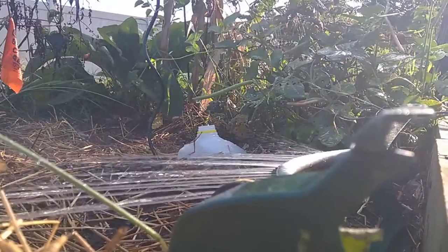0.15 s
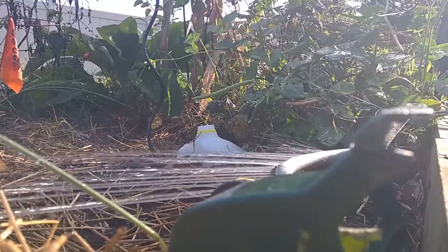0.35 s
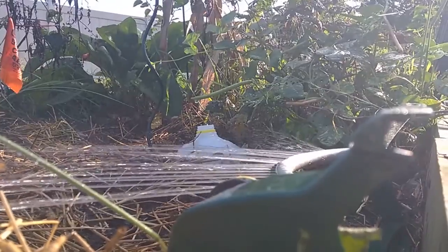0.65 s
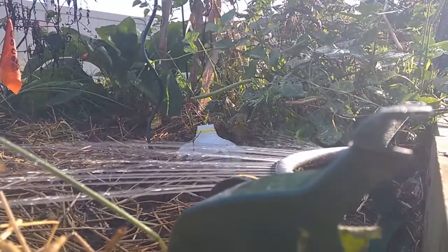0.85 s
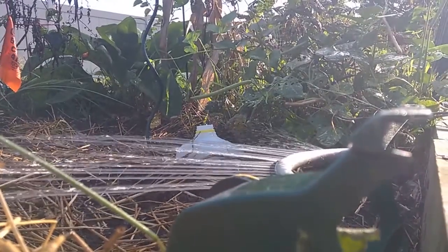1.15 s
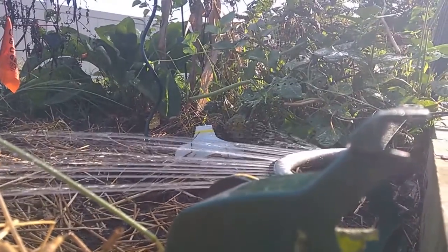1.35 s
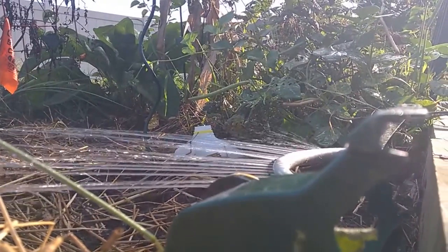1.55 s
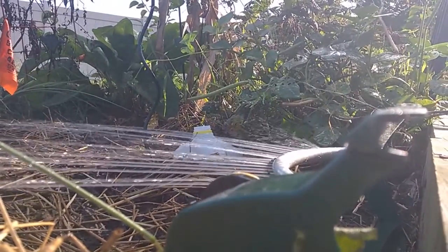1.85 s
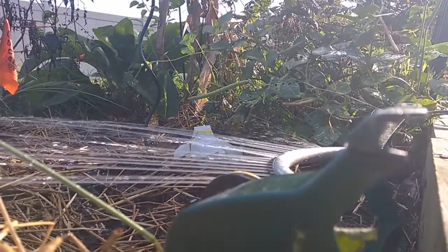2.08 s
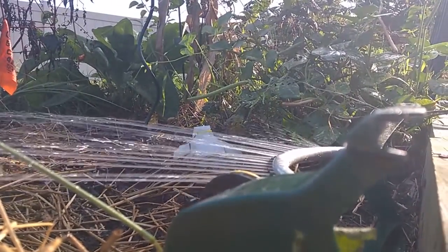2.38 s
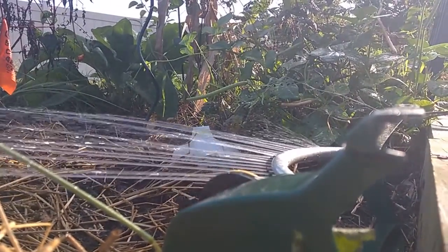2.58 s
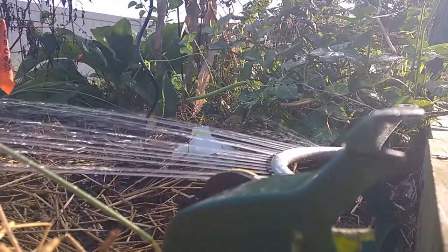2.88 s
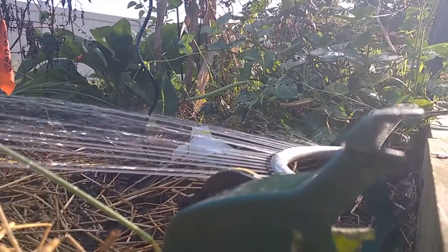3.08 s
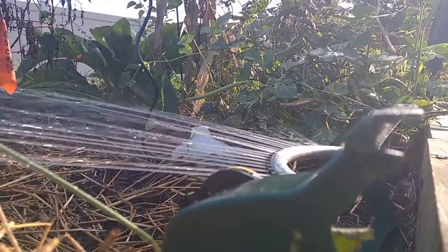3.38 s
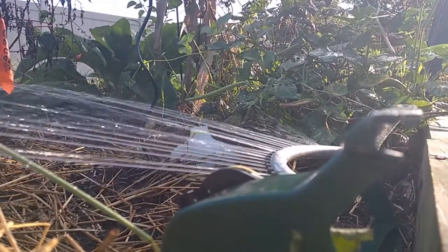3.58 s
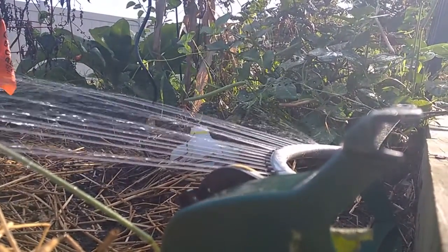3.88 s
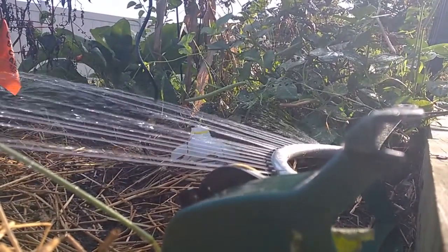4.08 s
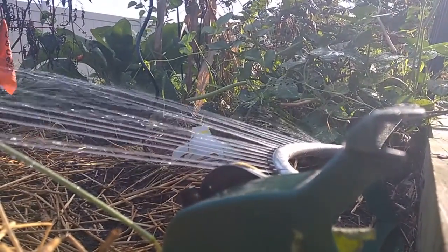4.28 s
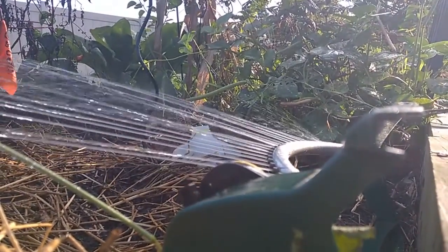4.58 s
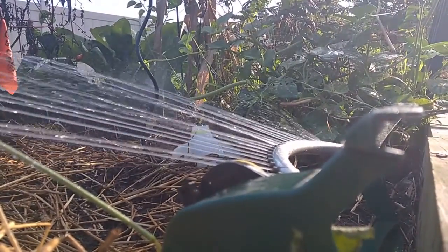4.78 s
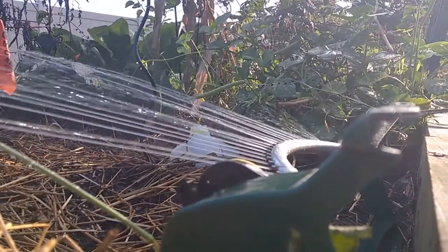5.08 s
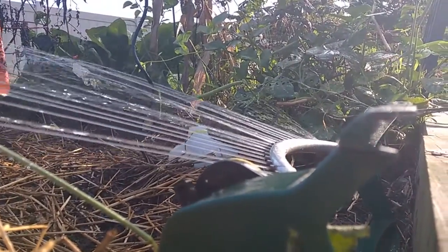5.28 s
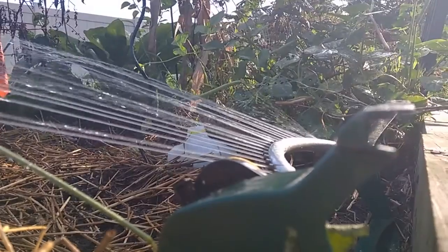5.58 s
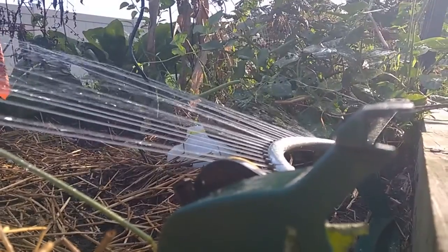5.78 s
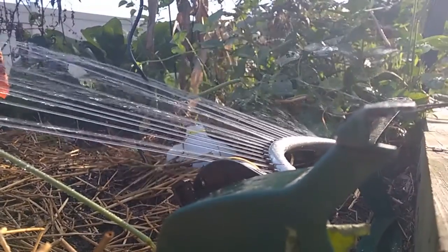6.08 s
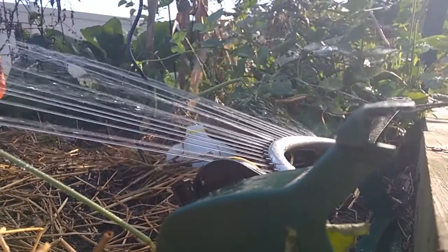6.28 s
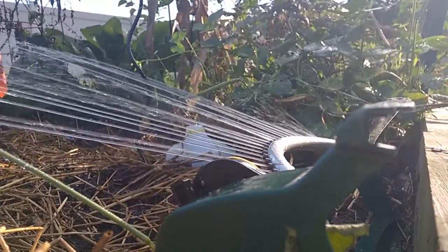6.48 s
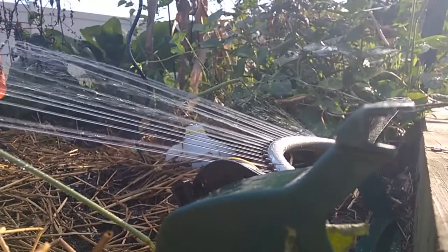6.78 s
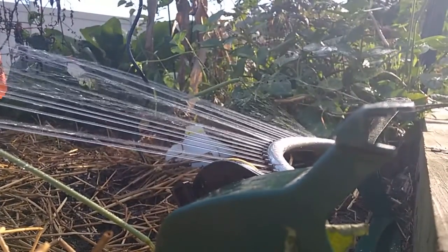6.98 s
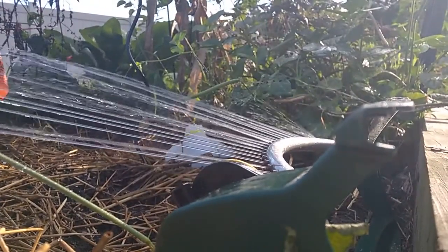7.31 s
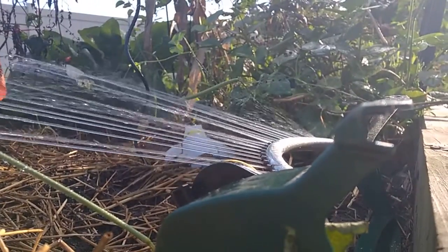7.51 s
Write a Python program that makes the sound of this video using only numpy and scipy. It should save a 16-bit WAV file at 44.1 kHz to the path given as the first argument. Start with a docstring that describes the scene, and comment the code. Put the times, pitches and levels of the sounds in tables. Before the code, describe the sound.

A garden sprinkler works very close to the microphone, over low outdoor rumble and dull air. Throughout, water rushes hollowly through tube and nozzles, pulsing with a water wheel that knocks about 24 times a second, a dry purring rattle with a faint hum. From 0 s low jets splash densely and crisply on near straw, with short brighter surges at about 1.5, 2.2 and, sharpest, 2.9 s, and smaller ones near 3.3 and 3.6. Single drops tick near. From about 4.5 s the splash dies away, gone by 5.1; between 4.6 and 4.95 quick low swishes, gulps and harder knocks crowd in. A finer high ticking patter of far drops takes over. At 5.6 s the wheel jumps slightly faster, its knocks often stronger and uneven. A soft low thump falls at 6.55 s. Rush, rattle and patter continue, with a small swish at the end, 7.6 s.

```python
"""An oscillating garden sprinkler close to one microphone, over a low outdoor rumble and a dull wash of air.
First the low jets splash on near straw with brief surges, while water rushes through tube and nozzles.
The jets lift and the splash dies away by 5.1 s; swishes and harder knocks come just before that.
A finer, ticking patter of far drops is left; the wheel jumps faster at 5.6 s and a soft thump follows.
Throughout, a water wheel knocks once a turn and hums. Water is filtered noise and drops; knocks are rings."""
import sys
import numpy as np
from scipy import signal
from scipy.io import wavfile
from scipy.ndimage import uniform_filter1d

SR = 44100
rng = np.random.default_rng(int(sys.argv[2]) if len(sys.argv) > 2 else 0)


def digitize_waveform(pressure):
    """Quantize a signal to 16-bit integers and store it at the path in sys.argv[1].

    Rows of a 2-D input are taken as channels; values are limited to [-1, 1].
    """
    field = np.atleast_2d(pressure).T
    bounded = np.clip(field, -1, 1)
    quanta = np.round(bounded * 32767).astype(np.int16)
    wavfile.write(sys.argv[1], SR, quanta)


N = 337353

# Speed of the water wheel that drives the tube: creeps faster, then jumps as the load eases.
# Each row: time in seconds, speed in turns per second.
WHEEL_SPEED = [(0, 23.596), (5.606, 24.352), (5.607, 25.026), (7.65, 24.715)]


def gain_of(db):
    """Decibels to gain."""
    return 10 ** (np.asarray(db) / 20)


def evened(x):
    """Scales to rms 1."""
    return x / np.sqrt(np.mean(x ** 2) + 1e-20)


def smoothed(x, samples):
    """Moving average applied twice."""
    return uniform_filter1d(uniform_filter1d(x, samples), samples)


def curve(rows, order=1):
    """One column of a table, interpolated sample by sample."""
    table = np.transpose(rows)
    return np.interp(np.arange(N) / SR, table[0], table[order])


def swell(peak_s, rise_s, fall_s):
    """Bell-shaped envelope with its own rise and fall."""
    u = np.arange(N) / SR - peak_s
    return np.exp(-(u / np.where(u < 0, rise_s, fall_s)) ** 2 / 2)


def band(x, edges_hz, kind, order=4):
    """Zero-phase Butterworth filter."""
    return signal.sosfiltfilt(signal.butter(order, edges_hz, kind, fs=SR, output="sos"), x)


def resonate(x, hz, width_hz):
    """A steep resonance: one band-pass pole pair applied twice."""
    b, a = signal.iirpeak(hz, hz / width_hz, fs=SR)
    return evened(signal.lfilter(b, a, signal.lfilter(b, a, x)))


def coloured(x, tone, size=4096):
    """Minimum-phase filter with the given spectrum, so that clicks keep a sharp front; rms 1."""
    f, db = np.transpose(tone)
    hz = abs(np.fft.fftfreq(size, 1 / SR))
    tone_db = np.interp(np.log(hz + 1), np.log(f), db, -70)  # -70 dB below the first row
    log_gain = np.log(gain_of(tone_db))
    phase = -signal.hilbert(log_gain).imag
    taps = np.fft.ifft(np.exp(log_gain + 1j * phase)).real[:size // 2]
    return evened(signal.oaconvolve(x, taps)[:N])


def rings(rows, rise_s, ring_s, noisy):
    """Short damped rings, partly roughened by noise."""
    out, t = np.zeros(N), np.arange(800) / SR
    shape = np.minimum(t / rise_s, 1) * np.exp(-np.maximum(t - rise_s, 0) / ring_s)
    grits = rng.standard_normal((len(rows), len(t)))
    for (s, db, hz), grit in zip(rows, grits):
        part = out[round(s * SR):][:len(t)]
        ring = gain_of(db) * shape * (np.sin(2 * np.pi * hz * t) + noisy * grit)
        part += ring[:len(part)]
    return out


def drops(per_s, spread_db, spatter_s):
    """Drops of uneven size at random times, each a short decaying spatter of noise."""
    size = gain_of(spread_db * np.minimum(rng.exponential(1, N), 3))
    size = size * (rng.random(N) < per_s / SR)
    envelope = signal.lfilter([1], [1, -np.exp(-1 / (spatter_s * SR))], size)
    return evened(envelope * rng.standard_normal(N))


def water(per_s, spread_db, spatter_s, share, patchy_db, flicker_db):
    """Hiss with patches, slow wide drifts of colour and level flicker, plus a power share of drops."""
    drift_db = 2.5
    z = signal.stft(rng.standard_normal(N), nperseg=256, noverlap=192)[2]
    patches = uniform_filter1d(uniform_filter1d(rng.standard_normal(z.shape), 3, 0), 24, 1)
    drift = uniform_filter1d(uniform_filter1d(rng.standard_normal(z.shape), 6, 0), 200, 1)
    flicker = uniform_filter1d(rng.standard_normal(z.shape[1]), 10)
    uneven_db = patchy_db * evened(patches) + drift_db * evened(drift) + flicker_db * evened(flicker)
    hiss = signal.istft(z * gain_of(uneven_db), nperseg=256, noverlap=192)[1][:N]
    share = np.clip(share, 0, 1)
    return np.sqrt(1 - share) * evened(hiss) + np.sqrt(share) * drops(per_s, spread_db, spatter_s)


def outdoors():
    """Low rumble, a dull wash of air and low narrow-band noise swells, and one damped sine thump."""
    # Rumble and air. Each row: time in seconds, level in dB.
    rumble_levels, air_levels = [(0, -48.5), (1.2, -48.5), (4.0, -49.5), (4.6, -47.5), (7.65, -49.5)], [(0, -57), (3, -57), (4.2, -54.5), (5.2, -57), (7.65, -59)]
    # Their spectra. Each row: frequency in Hz, relative density in dB per Hz.
    rumble_tone, air_tone = [(8.8, -48), (15, -3.5), (30, -8), (42, 0.5), (60, -2), (87, -5.5), (140, -11),
                             (163, -18), (200, -20.5), (260, -37), (440, -120)], [(100, -25), (170, -6.5), (260, -2), (500, -4), (800, -3),
                                                  (1200, -8), (2000, -72)]
    # Low narrow-band noise swells. Each row: peak in seconds, rise in s, fall in s, level in dB,
    # centre in Hz, width in Hz.
    low_swells = [(1.67, 0.18, 0.53, -58, 136, 4.8), (6.3, 0.74, 1.4, -54, 50, 2.6),
                  (5.55, 0.14, 0.18, -46.5, 60, 1.9)]
    # Thump, one row: centre in seconds, level in dB before its decay, pitch in Hz, decay either side in s.
    thump_s, thump_db, thump_hz, decay_s = (6.5585, -28.5, 66, .014)
    lumps = evened(smoothed(rng.standard_normal(N), 5000))
    rumble = coloured(rng.standard_normal(N), rumble_tone, size=32768)
    rumble = gain_of(curve(rumble_levels) + 0.94 * lumps) * rumble
    air = gain_of(curve(air_levels)) * coloured(rng.standard_normal(N), air_tone)
    low_noise = sum(gain_of(db) * swell(s, rise_s, fall_s) * resonate(rng.standard_normal(N), hz, width_hz)
                    for s, rise_s, fall_s, db, hz, width_hz in low_swells)
    u = np.arange(N) / SR - thump_s
    thump = gain_of(thump_db) * np.exp(-abs(u / decay_s)) * np.sin(2 * np.pi * thump_hz * u)
    return rumble + air + low_noise + thump


def turning():
    """Turns of the water wheel so far: its speed summed over time."""
    start_turns = 0.393
    return start_turns + np.cumsum(curve(WHEEL_SPEED)) / SR


def wheel():
    """The wheel rings the housing once a turn; its blades hum at the blade rate, louder when faster."""
    # Knocks, in runs of strong and weak. Each row: time in seconds, level in dB before random spread.
    knock_levels = [(0, -37.5), (4.0, -37), (5.05, -38), (5.14, -31.5), (5.55, -36.5), (6.0, -32.5),
                    (6.72, -32), (6.95, -39), (7.06, -32), (7.38, -32), (7.5, -37)]
    # Hard knocks, set on the nearest turn. Each row: time in seconds, level in dB.
    hard_knocks = [(4.67, -31), (4.87, -28), (4.92, -29), (5.41, -31), (6.25, -30), (6.7, -31), (6.86, -30),
                   (7.3, -31), (7.34, -28)]
    spread_db, lead_s = 1.3, 0.0012
    housing_rings = [(1640, 0), (2120, -9)]  # Hz, relative dB
    blades, start_hum_db, hum_db_per_turn_per_s = 12, -68, 5.6
    hum_wobble_db, hum_waver_hz = 0.9, 3

    turns_per_s = curve(WHEEL_SPEED)
    hit = np.flatnonzero(np.diff(np.floor(turning())))
    chance = rng.standard_normal((len(hit), 2))
    level_db = curve(knock_levels)[hit] + spread_db * np.clip(chance[:, 0], -2, 1)
    for s, db in hard_knocks:
        level_db[np.argmin(abs(hit - s * SR))] = db
    knocks = np.zeros(N)
    for hz, db in housing_rings:
        rows = np.c_[hit / SR - lead_s, level_db + db, hz + 70 * chance[:, 1]]
        knocks += rings(rows, rise_s=0.00036, ring_s=0.0031, noisy=0.11)

    waver, wobble = (evened(smoothed(v, 2000)) for v in rng.standard_normal((2, N)))
    hum = np.sin(2 * np.pi * np.cumsum(blades * turns_per_s + hum_waver_hz * waver) / SR)
    hum_db = start_hum_db + hum_db_per_turn_per_s * (turns_per_s - turns_per_s[0]) + hum_wobble_db * wobble
    return band(knocks, [1100, 4000], "band") + np.sqrt(2) * gain_of(hum_db) * hum


def tube():
    """Turbulent flow in the tube's resonances, pulsing with the wheel, plus low, brightening swishes and gulps."""
    # Rush. Each row: time in seconds, level in dB before the pulse, gain in dB of its 2.6-3.8 kHz band.
    rush_levels = [(0, -46.5, 0), (1.6, -46.5, -12), (2.5, -44, -3), (3.9, -45, -0.5), (5.1, -45.5, 3),
                   (6.3, -45, 1.5), (7.0, -47, 3), (7.65, -46.5, 4)]
    # Spectra. Each row: frequency in Hz, relative density in dB per Hz.
    rush_tone, swish_tone = [(350, -21), (600, -17), (712, -16.5), (947, -11), (1120, -4.5), (1210, -2.5),
                             (1300, -6.5), (1530, -2.5), (1740, -5.5), (1940, -8.5), (2120, -4),
                             (2410, -10.5), (2540, -12.5), (3100, -9.5), (3550, -11), (3850, -18.5),
                             (4200, -21.5), (5460, -56), (9240, -120)], [(180, -22), (300, -5), (450, -5), (1000, -0.5),
                                                (1300, -3.5), (2000, -58)]
    # Narrow tube resonances. Each row: frequency in Hz, width in Hz, level in dB before the pulse.
    tube_modes = [(1199, 18, -58.5), (1377, 410, -50.5), (1807, 38, -55.5)]
    # Swishes. Each row: peak in seconds, rise in s, fall in s, low gush in dB, extra rush in dB.
    swishes = [(4.63, 0.08, .12, -49.5, -69), (4.77, 0.035, 0.06, -50, -44),
               (4.865, 0.022, 0.028, -39.5, -46), (4.925, 0.02, 0.024, -45, -43.5),
               (7.64, 0.041, .05, -50.5, -43)]
    # Gulps between knocks. Each row: start in seconds, level in dB before the band-pass, ring in Hz.
    gulp_rows = [(4.757, -30, 1720), (4.772, -35, 1550), (4.835, -35, 1210), (5.590, -34, 1290),
                 (6.636, -37, 1600), (7.083, -35, 1630), (7.308, -31, 1230)]
    pulse_db, pulse_turn, pulse_sharpness = -2.5, 0.9, 3  # the flow sags just before each knock

    flow = water(per_s=500, spread_db=3, spatter_s=.0018, share=.17, patchy_db=.7, flicker_db=.2)
    flow = coloured(flow, rush_tone)
    band_gain = gain_of(curve(rush_levels, order=2))
    shaped = flow + band(flow, [2600, 3800], "band") * (band_gain - 1)
    modes = sum(gain_of(db) * resonate(rng.standard_normal(N), hz, width_hz) for hz, width_hz, db in tube_modes)
    sag = np.exp(pulse_sharpness * (np.cos(2 * np.pi * (turning() - pulse_turn)) - 1))
    rush = gain_of(pulse_db * sag) * (gain_of(curve(rush_levels)) * shaped + modes)

    gush = water(per_s=600, spread_db=3.5, spatter_s=.003, share=.25, patchy_db=1.2, flicker_db=.7)
    gush = coloured(gush, swish_tone)
    bright = evened(band(flow[::-1], [1150, 1950], "band", order=2))  # another stretch of the same flow
    gush_gain = sum(gain_of(db) * swell(s, rise_s, fall_s) for s, rise_s, fall_s, db, _ in swishes)
    bright_gain = sum(gain_of(db) * swell(s, rise_s, fall_s) for s, rise_s, fall_s, _, db in swishes)
    gulps = rings(gulp_rows, rise_s=.002, ring_s=.005, noisy=.2)
    gulps = band(gulps, [900, 3000], "band", order=2)
    return rush + gush_gain * gush + bright_gain * bright + gulps


def patter():
    """A soft bed of far drops, fine ticks in the high treble, and single near drops as short rings."""
    # Far drops. Each row: time in seconds, bed level in dB.
    levels = [(0, -47.5), (2.6, -71), (3.1, -60.5), (5.2, -48.5), (6.6, -49.5), (7.3, -46), (7.65, -49)]
    # Spectrum. Each row: frequency in Hz, relative density in dB per Hz.
    tone = [(2600, -16), (4100, -3), (4500, -6), (5050, 0), (5600, -7), (6050, -4), (6500, -7), (8000, -1),
            (9000, -2.5), (9700, -8.5), (10400, -6), (11600, -11), (12300, -3), (13400, -11.5),
            (14300, -4.5), (15700, -11)]
    # Near drops. Each row: start in seconds, level in dB before noise and high-pass, ring in Hz.
    near_drops = [(2.2168, -28, 8500), (2.2562, -29, 8800), (2.9255, -27, 8000), (2.9408, -27, 12800),
                  (2.9775, -26, 9000), (3.4465, -29, 9000), (3.5942, -29, 8400), (4.4877, -32, 14400),
                  (5.4041, -34, 12400), (5.5518, -28.5, 11900), (5.56, -33, 12200), (5.9199, -30, 12300),
                  (6.1699, -33.5, 12700), (6.4996, -33, 14300), (6.6707, -34.5, 12300),
                  (6.9621, -34, 12300), (7.1142, -31.5, 12400), (7.2679, -33, 12800), (7.5213, -34, 14000)]
    bed = water(per_s=1400, spread_db=5, spatter_s=0.00017, share=0.4, patchy_db=1.5, flicker_db=0.7)
    bed = coloured(bed, tone)
    ticks = drops(per_s=350, spread_db=3.5, spatter_s=.0005)
    ticks = band(coloured(ticks, tone), 10500, "high")
    near = band(rings(near_drops, rise_s=.0003, ring_s=.0005, noisy=.8), 5500, "high")
    return gain_of(curve(levels)) * (bed + gain_of(-2) * ticks) + near


def splash():
    """Dense drops on near straw, dying away as the jets lift, with surges of band-passed spray."""
    # Splash. Each row: time in seconds, level in dB before the lift, gain in dB of the 11-12.3 kHz band,
    # gain in dB of the treble above it.
    levels = [(0, -42.5, 2, -2), (1.2, -41.5, 1.5, 3.5), (2.0, -39, 0, 0.5), (2.5, -41.5, 2.5, 3),
              (3.1, -39.5, -5, -1), (3.5, -41.5, 6.5, 1.5), (4.0, -42.5, 5, -1), (4.5, -45.5, 5, 1),
              (5.0, -46, 14, 6)]
    # Spectrum. Each row: frequency in Hz, relative density in dB per Hz.
    tone = [(1350, -29), (2400, -11), (3000, -3), (3600, -8), (4250, -21.5), (4550, -19), (4900, -8.5),
            (5350, -7.5), (5700, -16), (6400, -6), (7150, 0), (7900, -5), (8400, -3), (9600, -5),
            (10500, -13), (11200, -11), (11900, -15), (13000, -6), (13700, -9), (14500, -5), (15700, -12)]
    # A jet briefly catching a stem or leaf. Each row: peak in seconds, level in dB, rise in s, fall in s,
    # low edge in Hz, high edge in Hz.
    surges = [(1.1, -46, 0.046, .04, 5500, 9800), (1.451, -40.5, 0.12, 0.046, 4600, 8800),
              (1.66, -45, 0.039, 0.11, 5500, 9000), (2.17, -35.5, 0.066, 0.092, 5260, 10200),
              (2.925, -46, 0.02, 0.047, 4300, 5600), (2.9, -40, 0.078, 0.043, 5760, 9300),
              (2.934, -34.5, 0.025, 0.059, 2290, 14700), (3.29, -43.5, 0.06, 0.071, 5830, 9050),
              (3.63, -43.5, 0.057, 0.047, 5800, 10200), (5.77, -45, 0.0061, 0.019, 2500, 5500),
              (7.17, -52, 0.03, 0.044, 3860, 5240)]
    hiss_db, spatter_db, ragged_db = -9, -9, 0.9  # in a surge; the first two relative to the spray

    spray = water(per_s=1800, spread_db=2, spatter_s=0.00048, share=0.22, patchy_db=1.0, flicker_db=-0.15)
    spray = coloured(spray, tone)
    steady = spray + band(spray, [11000, 12300], "band") * (gain_of(curve(levels, order=2)) - 1)
    steady += band(spray, 12400, "high") * (gain_of(curve(levels, order=3)) - 1)
    lift = np.clip((5.1 - np.arange(N) / SR) / 0.63, 0, 1)
    out = gain_of(curve(levels)) * lift * steady

    surge = spray[::-1] + gain_of(hiss_db) * rng.standard_normal(N)  # another stretch of the same spray
    surge += gain_of(spatter_db) * coloured(drops(per_s=450, spread_db=2.5, spatter_s=.0004), tone)
    surge *= gain_of(ragged_db * evened(smoothed(rng.standard_normal(N), 250)))
    for s, db, rise_s, fall_s, low_hz, high_hz in surges:
        near = slice(round(s * SR) - SR // 2, round(s * SR) + SR // 2)
        gush = band(surge[near], [low_hz, high_hz], "band", order=2)[::-1]
        out[near] += gain_of(db) * evened(gush) * swell(s, rise_s, fall_s)[near]
    return out


def scene():
    """All water flutters with the shared pressure; one microphone feeds both channels."""
    pressure_db = 0.51
    flutter = evened(smoothed(rng.standard_normal(N), 500))
    wet = gain_of(pressure_db * flutter) * (splash() + patter() + tube())
    return np.tile(wet + wheel() + outdoors(), (2, 1))


def record(dry):
    """The band limit: a steep linear-phase low-pass."""
    edge_hz = 15750
    taps = signal.firwin(2047, edge_hz, window=("kaiser", 9), fs=SR)
    return signal.oaconvolve(dry, taps[None], "same")


dry = scene()
out = record(dry)
digitize_waveform(out)
```